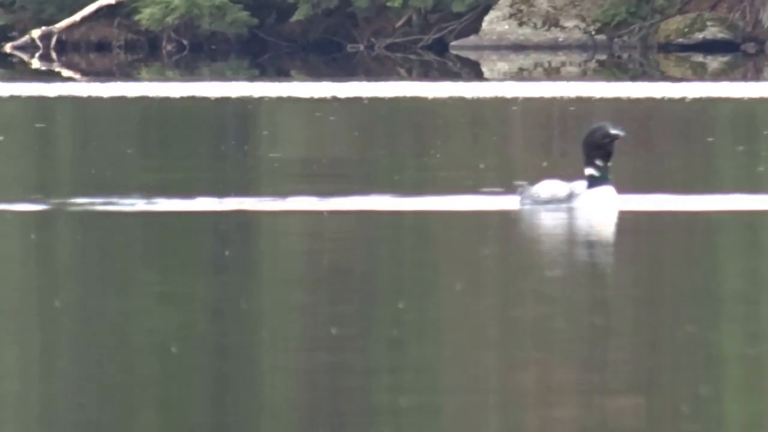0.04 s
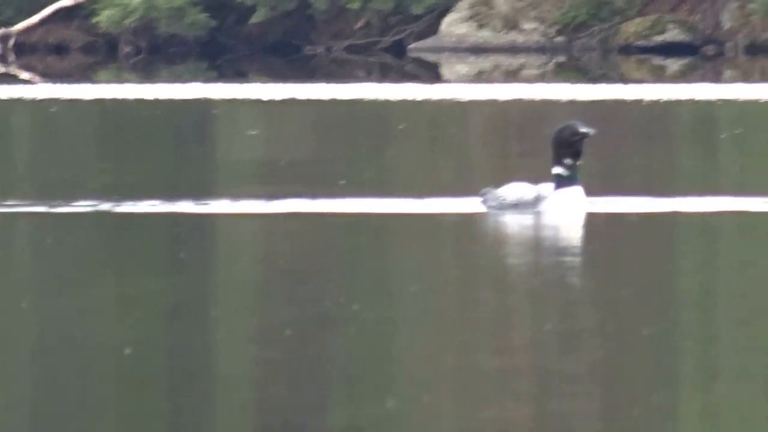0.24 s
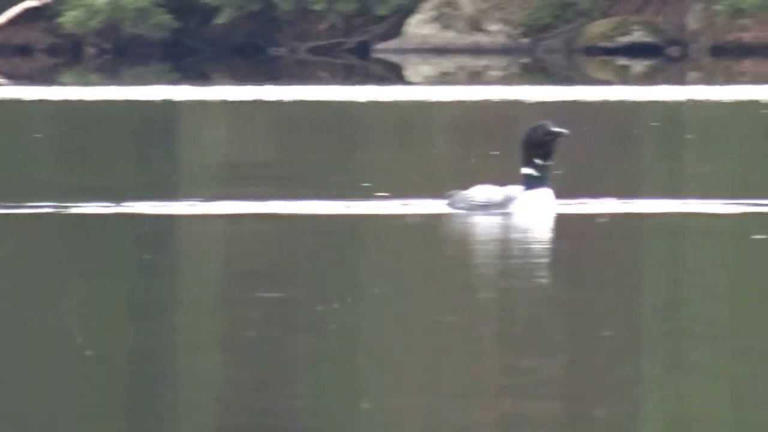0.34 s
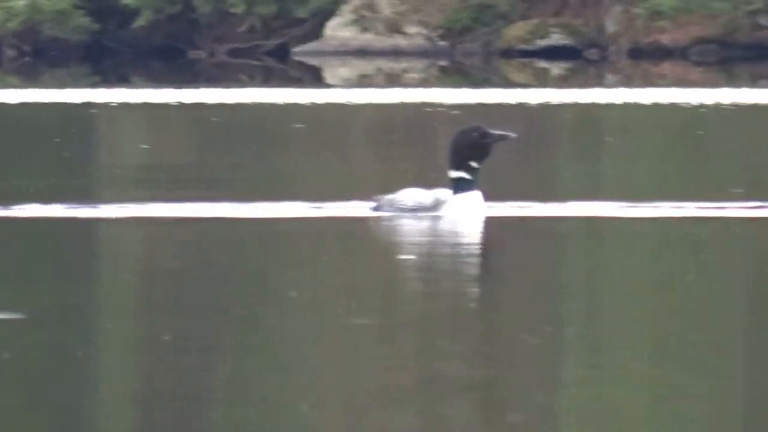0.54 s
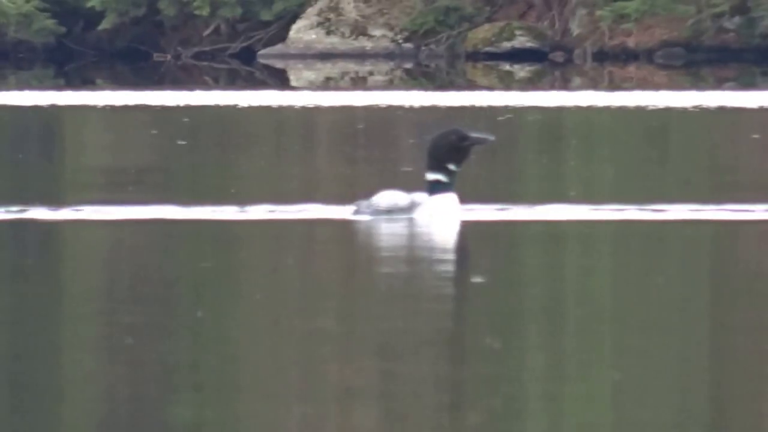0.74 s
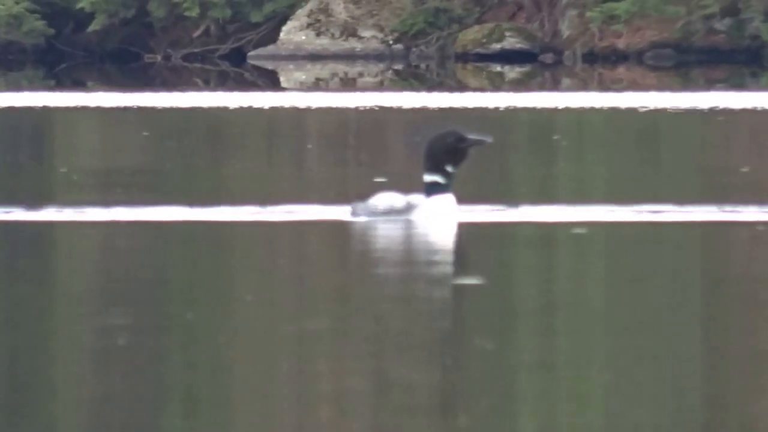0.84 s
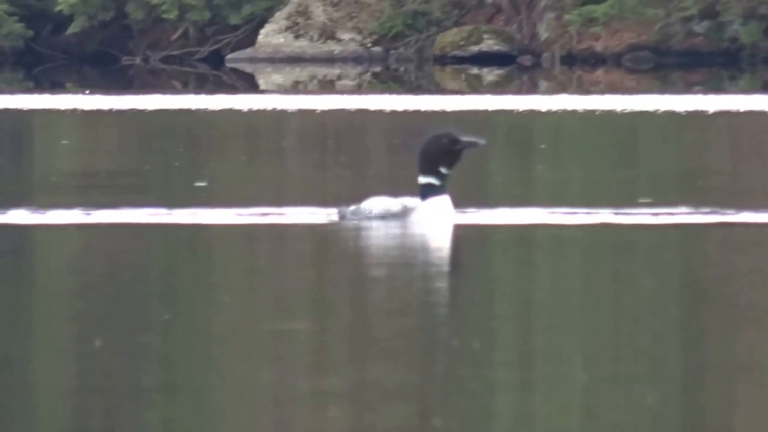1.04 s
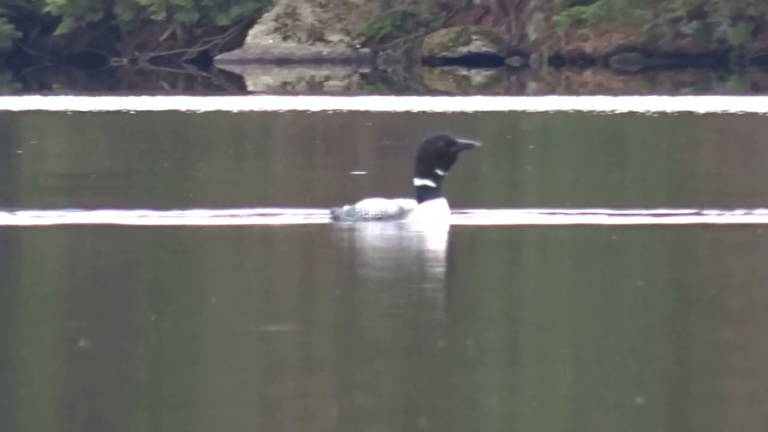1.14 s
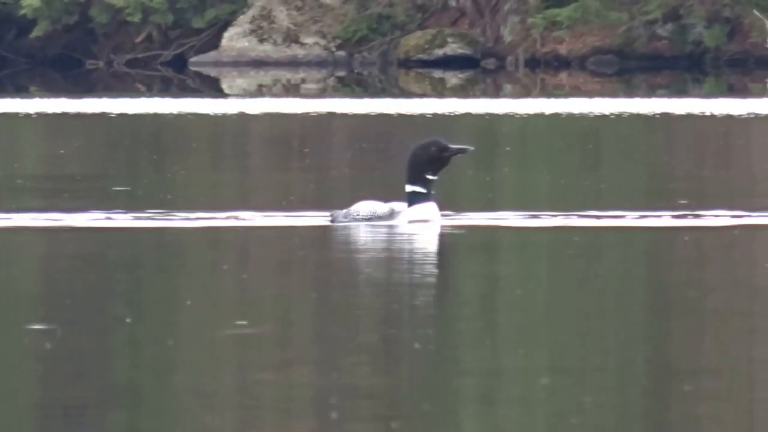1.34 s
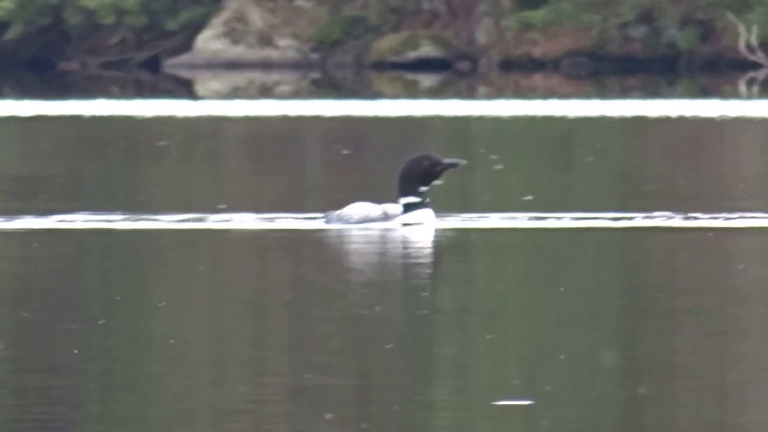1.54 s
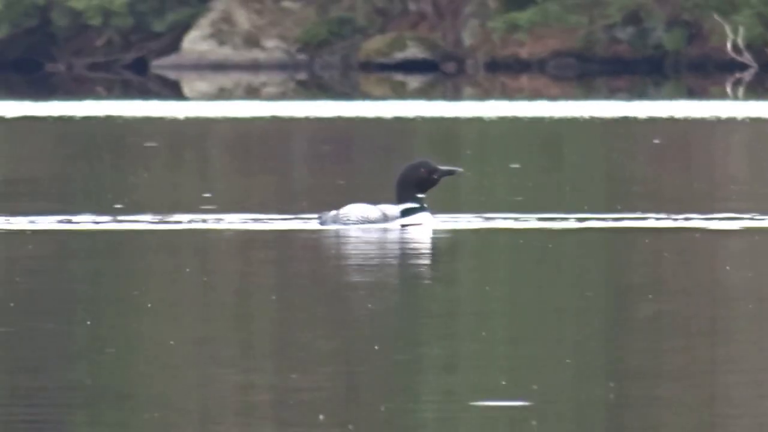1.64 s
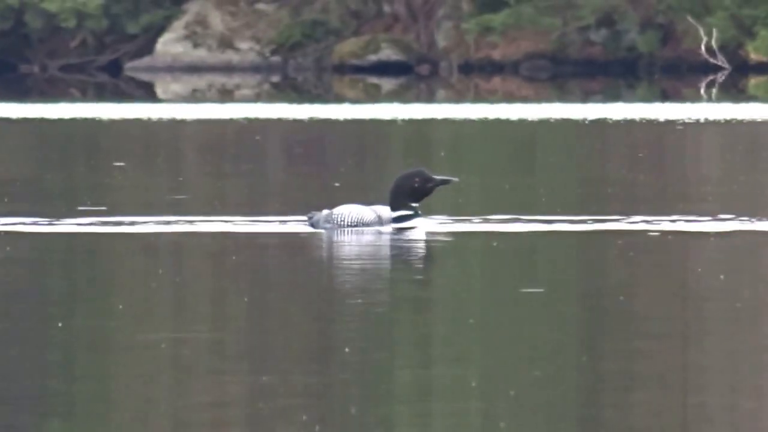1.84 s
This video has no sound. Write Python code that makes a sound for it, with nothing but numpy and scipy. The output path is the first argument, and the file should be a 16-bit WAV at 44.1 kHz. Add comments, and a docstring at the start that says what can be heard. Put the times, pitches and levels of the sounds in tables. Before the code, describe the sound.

A distant loon wails once on a calm lake, stepping up from a low note to a long arched one. The shore returns a soft echo over a quiet outdoor hush, with faint ticks and air bumps at the microphone.

```python
"""A loon wails far out on a calm lake: a thin rising lead-in, a low note, then a jump up to a long
arched note. Its voice is a stack of harmonics, tones at whole multiples of a slightly unsteady pitch.
Trees and rocks on the shore send back a long soft echo. Over the quiet outdoor hush a small bird
chips once; close by there are two faint ticks and soft bumps of air on the microphone."""
import sys
import numpy as np
from scipy import signal
from scipy.fft import rfft, irfft, next_fast_len
from scipy.io import wavfile

SR = 44100
rng = np.random.default_rng(int(sys.argv[2]) if len(sys.argv) > 2 else 0)


def transcribe(u):
    """Save the signal u as a 16-bit wav file named by the first command-line argument.

    u: samples, shape (n,) or (channels, n), limited to [-1, 1]; the rate is SR.
    q: integer samples, one column per channel.
    """
    v = np.clip(np.atleast_2d(u).T, -1, 1)
    q = np.round(v * 32767).astype(np.int16)
    wavfile.write(sys.argv[1], SR, q)


N = 83790
T = np.arange(N) / SR

# the loon's thin rising lead-in: t/s, f/Hz, level/dB
LEAD_IN = [(0.0, 335.3, -48), (0.06, 367.5, -42.5), (0.115, 384.4, -38), (0.131, 396, -37.5),
           (0.142, 429, -40), (0.165, 474, -47), (0.187, 517, -56)]
# its harmonics, the second by far the strongest: harmonic number, gain/dB
LEAD_IN_HARMONICS = [(1, -19), (2, 0), (3, -23)]
# the swelling low note: t/s, f/Hz, level/dB
LOW_NOTE = [(0.19, 668, -36), (0.215, 671.2, -31.5), (0.29, 681.7, -28.5), (0.40, 700.8, -25),
            (0.433, 718, -24), (0.447, 755, -24.5)]
# its harmonics 2 to 5 compared with the first: t/s, then gain/dB for each
LOW_OVERTONES = [(0.2, -25.5, -55.5, -35, -55.5), (0.25, -29, -52.5, -36, -52.5),
                 (0.3, -27.5, -51.5, -43.5, -45.5), (0.36, -25, -42, -44, -46),
                 (0.44, -25, -46.5, -47, -42)]
# the long high note: t/s, f/Hz, level/dB
WAIL = [(0.448, 858, -27.5), (0.475, 873, -24.5), (0.585, 880, -23.5), (0.63, 879.3, -23.5),
        (0.74, 891.4, -23), (0.81, 897, -23.5), (0.955, 894.3, -22), (1.05, 883.7, -23.5),
        (1.2, 870.5, -23.6), (1.34, 853.8, -24.5), (1.49, 830.1, -27), (1.55, 813, -30.5),
        (1.578, 810, -36)]
# its harmonics 2 to 4 compared with the first: t/s, then gain/dB for each
WAIL_OVERTONES = [(0.45, -36, -36.5, -44), (0.52, -34, -34, -35.5), (0.68, -29.5, -35, -31),
                  (0.8, -29, -33.5, -35), (0.94, -31.5, -34.5, -42), (1.07, -29, -36, -36.5),
                  (1.27, -32, -33.5, -37), (1.42, -33, -32.5, -44.5), (1.57, -45.5, -30.5, -54.5)]
# faint high harmonics that give the long note an edge: harmonic number, gain/dB
EDGE_HARMONICS = [(5, -54), (7, -53.5), (8, -50), (11, -54.5)]
# how that edge swells and fades: t/s, added gain/dB
EDGE_SWELL = [(0.5, -10), (0.68, -11), (0.8, -2.5), (0.96, 0.5), (1.1, -3), (1.28, -5.5), (1.45, -14.5)]
# the voice drops back as it stops: t/s, f/Hz, level/dB
LAST_DROP = [(1.581, 640, -60.5), (1.592, 615, -45), (1.615, 600, -61)]
# the loon's place, a little to the right: f/Hz, left minus right/dB
LOON_PAN = [(900, -.7), (1700, -2), (2700, -2.7), (7000, -1)]
# how much of each frequency the shore sends back: f/Hz, gain/dB
SHORE_COLOUR = [(300, -17), (690, -16), (870, -15), (1400, -12), (1800, -16), (2700, -18.5), (4000, -19),
                (10000, -19.5)]
# reflections, near shore first and far shore later: delay/s, relative level/dB
SHORE_RETURNS = [(0.0, -16), (0.05, 4), (0.2, 2), (0.45, -5.5), (0.6, -16.5), (1.1, -19), (1.25, -10.5),
                 (1.45, -9.5), (1.9, -23)]
# stereo width of the echo: f/Hz, side minus mid/dB
SHORE_WIDTH = [(880, -18), (1400, -8), (4000, -7)]
# the outdoor hush, strongest in the bass: f/Hz, relative level/dB
HUSH_COLOUR = [(25, -13.5), (45, -5), (68, 1.5), (100, -5), (170, -0.5), (300, -3.5), (500, -9.5),
               (900, -10.5), (1350, -11), (1650, -19.5), (2300, -22), (3000, -26.5), (4800, -30.5),
               (6800, -28), (9000, -31.5), (15500, -34.5)]
# stereo width of the hush: f/Hz, side minus mid/dB
HUSH_WIDTH = [(50, -18.5), (170, -18), (400, -9), (1400, -6.5), (4000, -8.5), (9000, -20)]
# the clicks that start the ticks: t/s, level before filtering/dB, left minus right/dB
TICKS = [(0.5042, -30.5, -5), (1.6805, -39.5, -4)]
# bumps of air on the microphone: t/s, half length/s, level at the loudest/dB, f/Hz
AIR_BUMPS = [(0.799, 0.019, -56.5, 54.7), (0.93, 0.04, -56, 41.4), (1.123, .016, -51.5, 58),
             (1.24, 0.019, -41.5, 68), (1.364, .02, -53, 58.8), (1.874, .012, -49, 85.1)]


def from_db(db):
    """Turn decibels into a number to multiply by."""
    return 10 ** (np.asarray(db) / 20)


def rms_one(x):
    """Scale a signal so its average strength (rms) is 1."""
    return x / np.sqrt(np.mean(x ** 2) + 1e-20)


def in_time(rows):
    """Turn each column after the first (time) into a curve over the whole scene."""
    times, *columns = np.transpose(rows)
    return [np.interp(T, times, column) for column in columns]


def colour(x, points, share=1):
    """Turn frequencies up or down by a table of f/Hz, gain/dB; share scales the decibels."""
    hz, db = np.transpose(points)
    size = next_fast_len(x.shape[-1] + 4096)
    bin_hz = np.maximum(np.arange(size // 2 + 1) * SR / size, 1)
    gain = from_db(share * np.interp(np.log(bin_hz), np.log(hz), db))
    return irfft(rfft(x, size) * gain, size)[..., :x.shape[-1]]


def drift(rate_hz):
    """A smooth random wobble of typical size 1; a higher rate makes it quicker."""
    r = np.exp(-2 * np.pi * rate_hz / SR)
    smoothed = signal.lfilter([1], [1, -2 * r, r * r], rng.standard_normal(N + SR))
    return rms_one(smoothed[SR:])


def resonance(x, hz, width_hz):
    """Make a signal ring at one frequency; a narrower width rings longer."""
    r = np.exp(-np.pi * width_hz / SR)
    feedback = [1, -2 * r * np.cos(2 * np.pi * hz / SR), r * r]
    return signal.lfilter(np.array([1, 0, -1]) * (1 - r * r) / 2, feedback, x + 1e-18)


def stereo(mid, side):
    """Make left and right from what they share (mid) and what sets them apart (side)."""
    return np.array([mid + side, mid - side])


def note(curve, harmonics):
    """One clean note from the bird's voice organ: harmonics on a slightly unsteady pitch."""
    attack_s, release_s = 0.0071, 0.0092
    jitter_share, shimmer_db = 0.00097, 0.88  # wobble of the pitch, and of each overtone's level
    hz, db = in_time(curve)
    fade_in = np.clip((T - curve[0][0]) / attack_s + .5, 0, 1)
    fade_out = np.clip((curve[-1][0] - T) / release_s + .5, 0, 1)
    gate = np.sin(fade_in * fade_out * np.pi / 2) ** 2
    phase = 2 * np.pi * np.cumsum(hz * (1 + jitter_share * drift(rate_hz=90))) / SR
    tone = np.zeros(N)
    for k, gain_db in harmonics:
        wobble_db = (k > 1) * shimmer_db * drift(rate_hz=57)
        tone += from_db(gain_db + wobble_db) * np.sin(k * phase)
    return np.sqrt(2) * from_db(db) * gate * tone


def loon():
    """The voice jumps from one range to the next; its overtones shift as the notes swell and fade."""
    low = list(enumerate([0] + in_time(LOW_OVERTONES), 1))  # the first harmonic stays at 0 dB
    high = list(enumerate([0] + in_time(WAIL_OVERTONES), 1))
    swell_db, = in_time(EDGE_SWELL)
    flicker_db = 2
    edge = [(k, db + swell_db + flicker_db * drift(rate_hz=4.6)) for k, db in EDGE_HARMONICS]
    return (note(LEAD_IN, LEAD_IN_HARMONICS) + note(LOW_NOTE, low)
            + note(WAIL, high + edge) + note(LAST_DROP, [(1, 0.0034)]))


def shore_echo(call):
    """Countless reflections from trees and rocks merge into a long tail that beats against the call."""
    strength = from_db(in_time(SHORE_RETURNS)[0])
    reflections = rng.standard_normal((2, N)) * strength / np.sqrt(np.sum(strength ** 2))
    returned = colour(call, SHORE_COLOUR)
    mid, side = signal.fftconvolve(returned[None], reflections, axes=1)[:, :N]
    return stereo(mid, colour(side, SHORE_WIDTH))


def hush(level_db=-55):
    """Steady air over the lake and distant woods makes a soft, low noise."""
    mid, side = colour(rng.standard_normal((2, N)), HUSH_COLOUR)
    return from_db(level_db) * stereo(rms_one(mid), colour(rms_one(side), HUSH_WIDTH))


def bird_chip(start_s=.415, length_s=.013, from_hz=6700, to_hz=5500, peak_db=-62.5):
    """A small bird gives one very short falling whistle."""
    progress = np.clip((T - start_s) / length_s, 0, 1)
    hz = from_hz + (to_hz - from_hz) * progress
    phase = 2 * np.pi * np.cumsum(hz) / SR
    return from_db(peak_db) * np.sin(np.pi * progress) * np.sin(phase)


def ticks(low_cut_hz=9500, snap_db=-9.5):
    """Tiny sharp clicks, each with a very short high ring."""
    clicks = np.zeros((2, N))
    for start_s, db, pan_db in TICKS:
        clicks[:, int(start_s * SR)] = from_db(db + np.array([.5, -.5]) * pan_db)
    treble_only = signal.butter(2, low_cut_hz, "high", fs=SR, output="sos")
    snap = signal.sosfilt(treble_only, clicks + 1e-18)
    return 2 * resonance(snap, hz=10900, width_hz=1800) + from_db(snap_db) * snap


def air_bumps(wander_share=0.34):
    """Each bump on the microphone is a few slow, uneven swings of air pressure."""
    pressure = np.zeros(N)
    for middle_s, half_s, db, hz in AIR_BUMPS:
        phase = 2 * np.pi * np.cumsum(hz * (1 + wander_share * drift(rate_hz=16))) / SR
        swell = np.exp(-.5 * ((T - middle_s) / half_s) ** 2)
        pressure += from_db(db) * swell * np.sqrt(2) * np.sin(phase)
    return pressure


def scene():
    """The loon a little to the right, its echo, the hush and the small sounds near the shore."""
    call = loon()
    direct = np.array([colour(call, LOON_PAN, share) for share in (.5, -.5)])
    return direct + shore_echo(call) + hush() + bird_chip() + ticks() + air_bumps()


def record(dry):
    """A steep filter cuts off the very highest treble."""
    cutoff_hz = 15750
    return signal.sosfilt(signal.ellip(12, .1, 80, cutoff_hz, fs=SR, output="sos"), dry)


dry = scene()
out = record(dry)
transcribe(out)
```